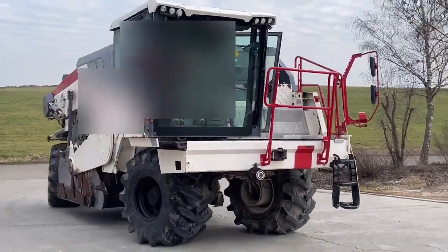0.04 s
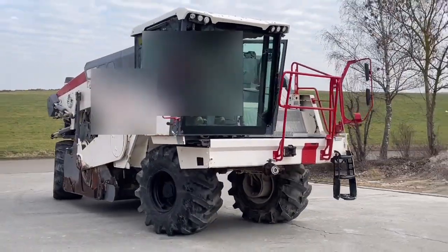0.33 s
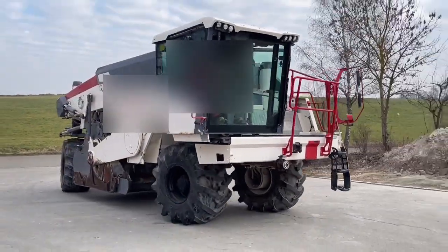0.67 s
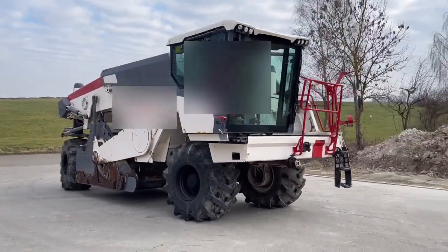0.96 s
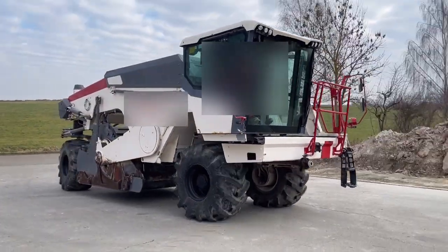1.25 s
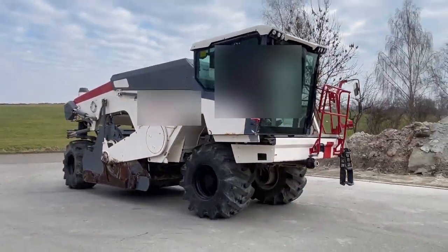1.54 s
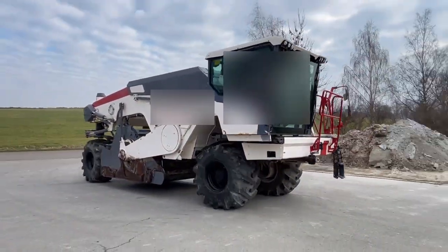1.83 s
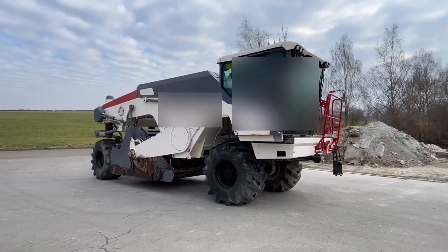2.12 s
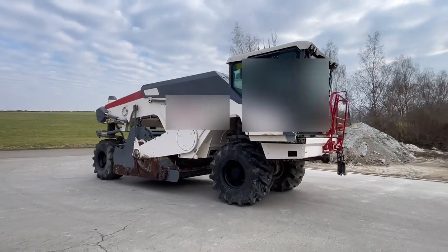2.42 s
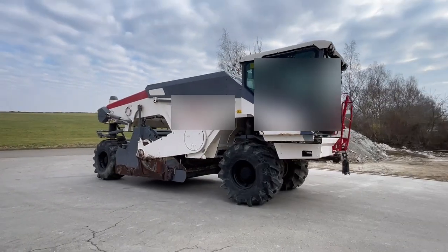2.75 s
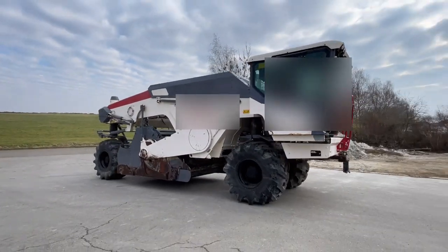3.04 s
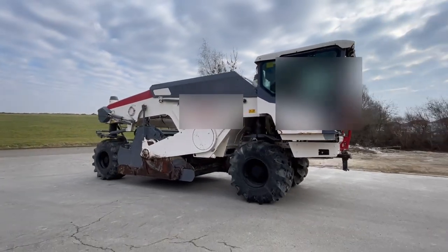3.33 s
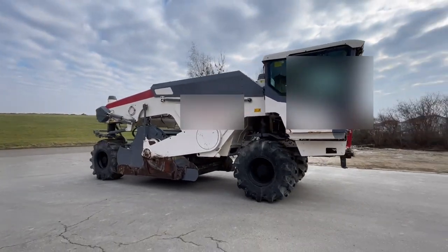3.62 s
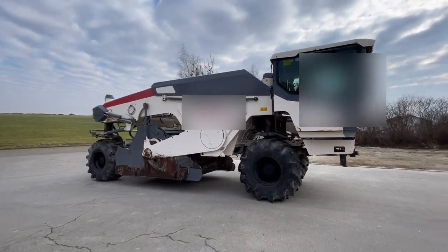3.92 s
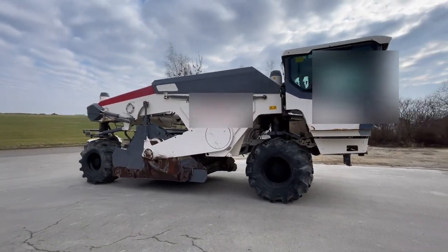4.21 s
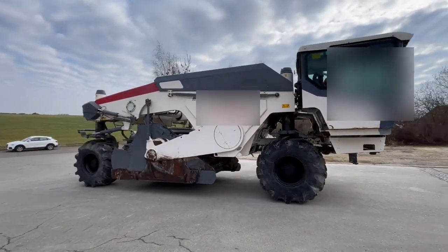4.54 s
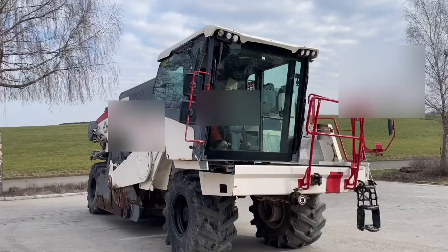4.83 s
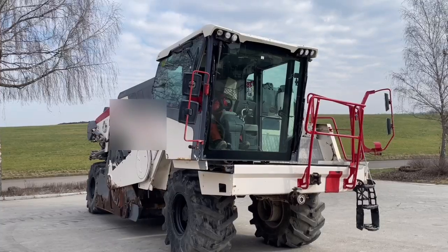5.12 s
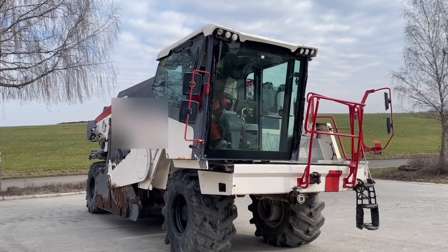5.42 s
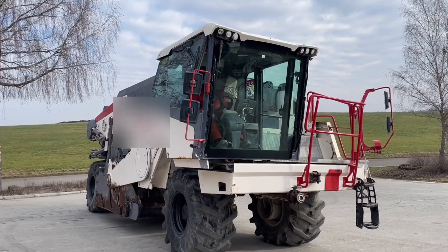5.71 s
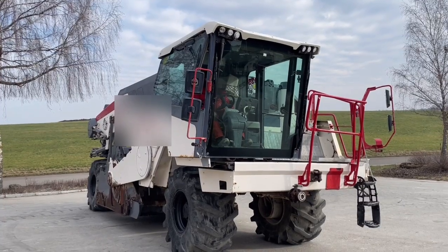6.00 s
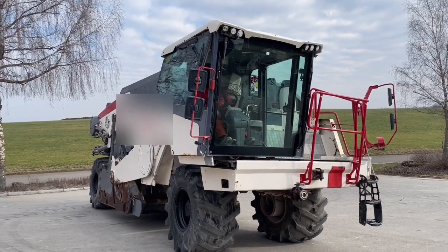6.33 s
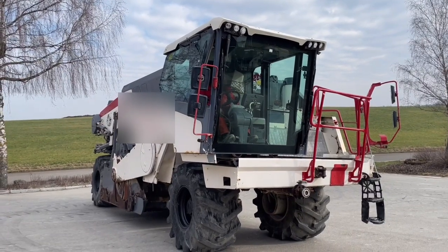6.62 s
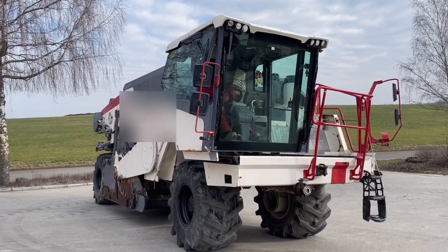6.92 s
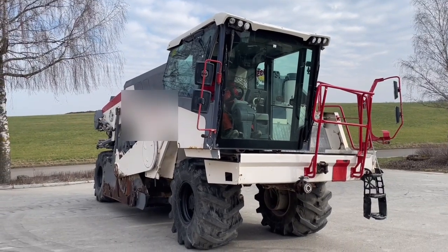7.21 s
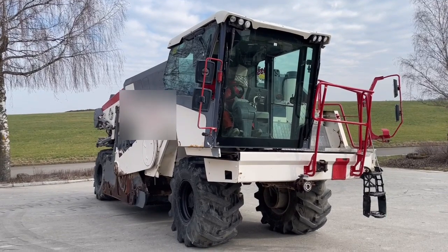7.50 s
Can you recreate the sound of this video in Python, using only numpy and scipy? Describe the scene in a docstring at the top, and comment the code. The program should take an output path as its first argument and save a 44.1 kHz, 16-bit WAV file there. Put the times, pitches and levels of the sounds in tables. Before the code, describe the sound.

From the start, a large diesel road machine runs at raised speed outdoors, heard close by while moving past it. The exhaust drones and throbs, the engine rattles and ticks, and a thin, high whistle of air sits on top. A hydraulic whine swells from about 1 to 3 seconds and again near 3.7 and 4.3, with short flares of higher gear whine. The clatter widens and the throb strengthens around 1.5 seconds; steel parts ring more from about 3.5. At 4.7 seconds everything fades quickly to a brief silence. By 5 seconds the engine is back, heard from the front at low idle: a deep, even drone with softer clatter, steady gear whine and quick, gentle chuffs of whistling air. One brief gritty scuff, like a shoe on paving, comes at about 5.2 seconds. The idle holds unchanged until the end, around 7.6 seconds.

```python
"""Six-cylinder diesel of a big road milling machine on a paved yard, heard while walking past its side.
At about 1600 rpm unequal cylinders make the exhaust throb, combustion and valve blows rattle the
block and ring the covers, a hydraulic pump and gears whine, and air whistles through a narrow opening.
After a short fade to silence it is heard from the front at low idle, about 1000 rpm, with a steady
gear whine, softly chuffing air and one brief scuff."""
import sys
import numpy as np
from scipy import signal
from scipy.fft import rfft, irfft, next_fast_len
from scipy.io import wavfile
from scipy.ndimage import uniform_filter1d, map_coordinates

SR = 44100
rng = np.random.default_rng(int(sys.argv[2]) if len(sys.argv) > 2 else 0)


def transcribe(u):
    """Save the signal u as a 16-bit wav file named by the first command-line argument.

    u: samples, shape (n,) or (channels, n), limited to [-1, 1]; the rate is SR.
    q: integer samples, one column per channel.
    """
    v = np.clip(np.atleast_2d(u).T, -1, 1)
    q = np.round(v * 32767).astype(np.int16)
    wavfile.write(sys.argv[1], SR, q)


N = 337806

# Raised engine speed, four-stroke cycles: time_s, cycle_hz
FAST_SPEED = [(0, 12.97), (0.3, 12.98), (0.7, 13.09), (1.05, 13.07), (1.5, 13.23), (2.0, 13.35),
              (2.5, 13.42), (3.0, 13.38), (3.5, 13.37), (4.0, 13.24), (4.7, 13.15)]
# Exhaust lines at raised speed: cycle_multiple, relative_db
DEEP_LINES = [(5, -33), (7, -34.5), (9, -24.5), (12, -30.5)]
THROB_LINES = [(9, -30), (10, -24), (11, -22.5), (12, -24.5), (13, -22.5), (14, -33)]
BUZZ_LINES = [(6, -27.5), (18, -32), (19, -32), (20, -27)]
# Exhaust lines at idle: cycle_multiple, level_db
IDLE_LINES = [(10, -35.5), (12, -21.5), (13, -37), (15, -30.5), (16, -33.5), (19, -42), (22, -40),
              (30, -39), (31, -41), (33, -40.5), (38, -47.5)]
# Exhaust parts along the walk: time_s, level_db
DEEP_LEVEL = [(0, -19.5), (.9, -21), (1.45, -35), (2.15, -31), (2.85, -25), (3.5, -29), (4.3, -36)]
THROB_LEVEL = [(.9, -34), (1.55, -22), (2.35, -21.5), (3.0, -24), (3.7, -26.5), (4.7, -27.5)]
OFFBEAT_LEVEL = [(2.5, -42), (3.1, -28), (4.7, -27.5)]
DRONE_LEVEL = [(0, -26.5), (1.65, -23), (2.15, -49), (3, -31), (4.7, -27.5)]
# Injector and valve ticks, ringing steel, pump and gear tones along the walk: time_s, level_db
TICK_LEVEL = [(0, -35.5), (1.25, -37.5), (1.5, -41), (3.4, -44.5), (3.65, -39), (4.7, -40.5)]
STEEL_LEVEL = [(2.5, -50), (3.5, -44.5), (3.9, -36.5), (4.7, -38)]
PUMP_WHINE_LEVEL = [(0, -21.5), (0.4, -30.5), (0.92, -33), (1.1, -21.5), (2.85, -23), (3.08, -32),
                    (3.38, -31), (3.72, -20), (3.94, -20.5), (4.1, -35), (4.3, -22.5), (4.7, -22.5)]
PUMP_HUM_LEVEL = [(0, -32), (0.6, -30), (1.35, -34.5), (1.8, -28.5), (1.95, -24.5), (2.85, -24.5),
                  (3.2, -28.5), (3.6, -36.5), (4.7, -34.5)]
GEAR_LEVEL = [(1.1, -51), (1.28, -42), (1.5, -49), (1.97, -33.5), (2.05, -49), (2.18, -38), (2.33, -38),
              (2.42, -54), (2.54, -39), (2.64, -50), (3.05, -46), (3.3, -35.5), (3.36, -46), (3.53, -38.5),
              (3.8, -53), (4.07, -41), (4.22, -54), (4.32, -39), (4.5, -51)]
# Resonances of covers and steel parts: centre_hz, half_width_hz, relative_db
FAST_COVER_MODES = [(788, 19, 4.5), (970, 47, 4), (1410, 9.4, -1.5), (1570, 100, -9.5), (2233, 190, -9.5),
                    (2783, 14, -9)]
IDLE_COVER_MODES = [(1530, 170, 3), (2360, 180, -2), (3600, 420, -7)]
STEEL_MODES = [(1620, 32, 2), (2776, 29, -7.5), (3320, 91, -11), (4060, 140, -11)]
# Pump and gear tones at idle: pitch_hz, level_db
IDLE_TONES = [(201.3, -37.5), (402.6, -40.5), (582.5, -40.5), (603, -48), (631.5, -38.5), (648, -40),
              (1163.6, -30), (1263.4, -41.5), (2529, -48.5)]
# Noise spectra: frequency_hz, relative_db
RUMBLE_SPECTRUM = [(16, -80), (30, -46), (55, -5), (134, -4.5), (259, -1.5), (328, -4.5), (377, -14),
                   (460, -15.5), (750, -85)]
FAST_BLOCK_SPECTRUM = [(250, -13.5), (380, -10.5), (570, -10), (700, -2), (980, -6.5), (1280, -14.5),
                       (1650, -14.5), (1950, -19), (2500, -25), (3300, -22.5), (5500, -28), (7300, -76)]
IDLE_BLOCK_SPECTRUM = [(16, -70), (28, -33), (50, -1.5), (85, -3.5), (125, 1), (185, -5), (295, -11),
                       (440, -14), (560, -14), (1020, -13), (1350, -23.5), (2000, -26), (2900, -30.5),
                       (5200, -43.5), (7000, -105)]
FAST_AIR_SPECTRUM = [(4000, 1.5), (5200, -14), (6900, 14), (8300, -7.5), (9400, 6), (12200, 4), (13000, -4),
                     (14000, -40)]
IDLE_AIR_SPECTRUM = [(4000, -12), (5200, 19.5), (6800, 16.5), (7500, 4.5), (8100, -13), (11600, 14.5),
                     (13000, -2.5), (14000, -20)]
# Stereo width of the noise: frequency_hz, side_minus_mid_db
NOISE_WIDTH = [(100, -18.5), (300, -13.5), (600, -11), (1300, -9.5), (3500, -5.5), (6000, -1.5), (9000, 9),
               (11500, -28)]
# Microphone balance: frequency_hz, left_minus_right_db
MIC_BALANCE = [(300, -1.97), (660, 1.3), (1200, 0.88), (2500, 0.61), (12000, -1.1)]


def exhaust(cycle, lines, scatter_turns, waver_db, blur_rad, rate_hz):
    """Unequal cylinders give lines at cycle multiples; low phase scatter bunches them into a chug."""
    return sum(tone(round(order) * cycle + scatter_turns * rng.random(), db, waver_db, blur_rad, rate_hz)
               for order, db in lines)


def fast_exhaust(cycle):
    """Deep note, drone and firing buzz over a rumble; one throb a cycle, later in the walk two."""
    deep_lag_cycles, throb_lag_cycles, offbeat_lag_cycles = 0.345, 0.675, 1.125
    deep = exhaust(cycle - deep_lag_cycles, DEEP_LINES, 0.072, waver_db=4.5, blur_rad=0.04, rate_hz=6)
    deep = amp(curve(DEEP_LEVEL)) * unit(deep)
    throb = 0
    for level, lag in ((THROB_LEVEL, throb_lag_cycles), (OFFBEAT_LEVEL, offbeat_lag_cycles)):
        chug = exhaust(cycle - lag, THROB_LINES, 0.06, waver_db=0.7, blur_rad=0.04, rate_hz=1.9)
        throb += amp(curve(level)) * unit(chug)
    drone = tone(15 * cycle, curve(DRONE_LEVEL), waver_db=1, blur_rad=0.05, rate_hz=1.7)
    buzz = exhaust(cycle, BUZZ_LINES, 0.63, waver_db=4.5, blur_rad=0.058, rate_hz=2)
    buzz = amp(walk_db(front_db=-24.5, side_db=-25.5, bay_db=2)) * unit(buzz)
    rumble_db = walk_db(-23, -24, 2.5) + 0.3 * np.cos(2 * np.pi * (cycle - throb_lag_cycles))
    blows = knocks(cycle, repeat=0.17, depth=0.4, decay=3.4, uneven_db=0.5)
    return deep + throb + drone + buzz + amp(rumble_db) * shaped(blows, RUMBLE_SPECTRUM)


def knocks(cycle, repeat, depth, decay, uneven_db, count=12, size=2048):
    """Combustion and valve blows, twelve a cycle; above the bass, part of the noise repeats each cycle."""
    lines = rfft(rng.standard_normal((2, size)))
    patterns = irfft(lines * (np.arange(lines.shape[1]) > 2 * count))
    repeating = np.array([np.interp(cycle % 1, np.arange(size) / size, p) for p in patterns])
    repeating *= np.sqrt(size * cycle[-1] / N)  # about the density of the free noise
    strength = amp(uneven_db * rng.standard_normal(count))[(cycle * count).astype(int) % count]
    blows = strength * np.exp(-decay * (cycle * count % 1))
    return (white() + repeat * repeating) * (1 + depth * unit(blows))


def fast_clatter(cycle):
    """Blows shake the block and ring covers and steel parts; injectors and valves tick."""
    def blows():
        return amp(0.36 * wobble(25.05)) * knocks(cycle, repeat=0.5, depth=0.21, decay=1.9, uneven_db=4.5)

    block = amp(walk_db(-22.5, -23, -0.45)) * shaped(flicker(blows(), depth_db=2), FAST_BLOCK_SPECTRUM)
    covers = amp(walk_db(-28, -29.5, 2)) * spread(blows(), ringing(FAST_COVER_MODES))
    tick_response = ringing([(3010, 470, 1), (3680, 200, -4.5), (4600, 250, -16)])
    ticks = amp(curve(TICK_LEVEL)) * spread(flicker(blows(), depth_db=2.7), tick_response)
    steel = amp(curve(STEEL_LEVEL)) * spread(blows(), ringing(STEEL_MODES))
    boom = amp(walk_db(-29.5, -41.5, 1)) * spread(blows(), ringing([(509, 38, 0)]))
    return block + covers + ticks + steel + boom


def idle_clatter(cycle):
    """Slower, more even blows on block and covers."""
    block = shaped(knocks(cycle, repeat=0.7, depth=0.11, decay=4.5, uneven_db=2.5), IDLE_BLOCK_SPECTRUM)
    cover_blows = knocks(cycle, repeat=0.24, depth=0.31, decay=1.7, uneven_db=5)
    return amp(-23.5) * block + amp(-42.5) * spread(cover_blows, ringing(IDLE_COVER_MODES))


def flicker(pair, depth_db):
    """Single pitches of the clatter flare and fade within hundredths of a second."""
    spectra = signal.stft(pair, nperseg=1024)[2]
    field = uniform_filter1d(rng.standard_normal(spectra.shape[1:]), size=3, axis=0)
    field = unit(uniform_filter1d(field, size=5, axis=1))
    return signal.istft(spectra * amp(depth_db * field), nperseg=1024)[1][:, :N]


def whine(turns, db, waver_db, blur_rad, rate_hz, side_db):
    """Machine tone whose reflections reach the two microphones differently."""
    side = tone(turns + rng.choice([-1, 1]) / 4, db + side_db, waver_db, blur_rad, rate_hz)
    return tone(turns, db, waver_db, blur_rad, rate_hz) + np.array([side, -side])


def fast_pump(cycle, order=48.45, beat_hz=6.2, beat_db=1.25):
    """Hydraulic pump: a throbbing whine, with its fundamental humming an octave below."""
    turns = order * cycle
    whine_db = curve(PUMP_WHINE_LEVEL) + beat_db * np.cos(2 * np.pi * beat_hz * time_s())
    octave = whine(turns, whine_db, waver_db=1.4, blur_rad=0.13, rate_hz=24, side_db=-16)
    hum = whine(turns / 2, curve(PUMP_HUM_LEVEL), waver_db=2.2, blur_rad=0.06, rate_hz=7.34, side_db=-21)
    return octave + hum


def fast_gears(cycle, order=140.1):
    """Gear whine locked to the engine, heard in short flares."""
    return whine(order * cycle, curve(GEAR_LEVEL), waver_db=3, blur_rad=0.4, rate_hz=45, side_db=6)


def idle_pump_and_gears(engine_s):
    """Steady tones that follow the engine."""
    return sum(whine(hz * engine_s, db, waver_db=1.56, blur_rad=0.11, rate_hz=18, side_db=-7.5)
               for hz, db in IDLE_TONES)


def whistle(centre_hz, half_width_hz, spacing_hz, bend_hz, squeak_db, wander_hz, flicker_db=9):
    """Air through a narrow opening: a hiss band and three unsteady squeaks that bend with pressure."""
    opening = ringing([(centre_hz, half_width_hz, 0)])
    sound = spread(white(), opening)
    for hz in (centre_hz - spacing_hz, centre_hz, centre_hz + spacing_hz):
        turns = np.cumsum(hz + bend_hz + wander_hz * wobble(20)) / SR
        flare = unit(amp(flicker_db * np.tanh(wobble(24))))
        blur_rad = np.array([wobble(40), wobble(40)])
        sound += amp(squeak_db) * opening(hz) * flare * np.sin(2 * np.pi * turns + blur_rad)
    return unit(sound)


def fast_air(cycle, rise_db_per_s=1.5):
    """Whistle, faint overtone and a hiss that grows as the side comes into view."""
    sing_db = walk_db(-31.5, -32.5, 2.5) + 1.3 * wobble(45)
    sing = whistle(6070, 235, spacing_hz=115, bend_hz=35 * wobble(8), squeak_db=0.5, wander_hz=25)
    overtone = spread(white(), ringing([(11900, 230, -2), (12800, 640, -6)]))
    hiss_db = -48 + rise_db_per_s * time_s() + chuff_db(cycle, once_db=0.5, twice_db=0.5, lag_turns=0.29)
    hiss = shaped(white(), FAST_AIR_SPECTRUM)
    return amp(sing_db) * sing + amp(walk_db(-53.5, -62.5, 3.5)) * overtone + amp(hiss_db) * hiss


def idle_air(cycle, sag_hz_per_s=35):
    """Whistle and hiss chuff at nine strokes a second; the pitch slowly sags."""
    bend_hz = 22 * np.cos(stroke_rad(cycle, lag_turns=0.61)) - sag_hz_per_s * (time_s() - 5)
    sing_db = -39.5 + chuff_db(cycle, once_db=1, twice_db=2, lag_turns=0.25)
    sing = whistle(5820, 175, spacing_hz=140, bend_hz=bend_hz, squeak_db=1, wander_hz=18)
    hiss_db = -48 + chuff_db(cycle, once_db=2.5, twice_db=1, lag_turns=0.4)
    return amp(sing_db) * sing + amp(hiss_db) * shaped(white(), IDLE_AIR_SPECTRUM)


def chuff_db(cycle, once_db, twice_db, lag_turns):
    """Level swing over each air stroke."""
    angle_rad = stroke_rad(cycle, lag_turns)
    return once_db * np.cos(angle_rad) + twice_db * np.cos(2 * angle_rad)


def stroke_rad(cycle, lag_turns, order=1.09):
    """Angle of an air stroke geared a little faster than the engine cycle."""
    return 2 * np.pi * (order * cycle - lag_turns)


def scuff(start_s=5.169, rise_s=0.0023, t60_s=0.28, db=-36):
    """Short gritty scuff, like a shoe on paving."""
    age_s = np.maximum(time_s() - start_s, 0)
    grit = shaped(white(), [(600, -30), (1800, 3), (3500, 8), (7500, -16), (12500, -1), (14000, -12)])
    return amp(db - 60 * age_s / t60_s) * (1 - np.exp(-age_s / rise_s)) * grit


def walk_db(front_db, side_db, bay_db, corner_s=2.02, ease_s=0.36, bay_s=1.53, bay_half_s=0.76):
    """Level before and after the front corner, plus a swell abreast of the engine bay."""
    round_corner = (1 + np.tanh((time_s() - corner_s) / ease_s)) / 2
    abreast = np.exp(-((time_s() - bay_s) / bay_half_s) ** 2)
    return front_db + (side_db - front_db) * round_corner + bay_db * abreast


def widened(pair):
    """Treble comes from one place in front, from the machine's whole length along the side."""
    mid, side = (pair[0] + pair[1]) / 2, (pair[0] - pair[1]) / 2
    treble = filtered(side, lambda hz: along([(700, 0.85), (2000, 1)], hz))
    side = side + treble * (amp(walk_db(-10, 3.5, 10)) - 1)
    return np.array([mid + side, mid - side])


def tone(turns, db, waver_db, blur_rad, rate_hz):
    """Sine that wavers in level and phase."""
    peak = np.sqrt(2) * amp(db + waver_db * wobble(rate_hz))
    return peak * np.sin(2 * np.pi * turns + blur_rad * wobble(rate_hz))


def ringing(modes):
    """Response of resonances: centre_hz, half_width_hz, relative_db."""
    return lambda hz: np.sqrt(sum((amp(db) / (1 + ((hz - centre_hz) / half_width_hz) ** 2)) ** 2
                                  for centre_hz, half_width_hz, db in modes))


def spread(pair, response):
    """Two noises filtered as mid and side; mid rms 1."""
    mid, side = filtered(pair, lambda hz: response(hz) * amp([0 * hz, along(NOISE_WIDTH, hz)]))
    return np.array([mid + side, mid - side]) / np.std(mid)


def shaped(pair, spectrum):
    """Stereo noise with a spectrum: frequency_hz, relative_db."""
    return spread(pair, lambda hz: amp(along(spectrum, hz)))


def filtered(x, response):
    """Apply a frequency response."""
    size = next_fast_len(N + SR // 10, True)
    return irfft(rfft(x, size) * response(np.fft.rfftfreq(size, 1 / SR)), size)[..., :N]


def wobble(rate_hz):
    """Smooth random curve."""
    knots = rng.standard_normal(1024)
    coarse_s = time_s()[::64]
    return np.interp(time_s(), coarse_s, map_coordinates(knots, [coarse_s * rate_hz], mode="wrap"))


def along(points, hz):
    """Interpolate over log frequency."""
    points_hz, values = np.transpose(points)
    return np.interp(np.log(hz + 1), np.log(points_hz + 1), values)


def curve(points):
    """Interpolate over time."""
    return np.interp(time_s(), *np.transpose(points))


def white():
    return rng.standard_normal((2, N))


def time_s():
    return np.arange(N) / SR


def amp(db):
    return 10 ** (np.asarray(db) / 20)


def unit(x):
    """Scale to rms 1."""
    return x / np.sqrt(np.mean(x ** 2) + 1e-20)


def raised_speed():
    """About 1600 rpm; tones swell and fade as the listener walks through their beams."""
    cycle = np.cumsum(curve(FAST_SPEED)) / SR
    return fast_clatter(cycle) + fast_pump(cycle) + fast_gears(cycle) + fast_air(cycle) + fast_exhaust(cycle)


def low_idle(cycle_hz=8.31):
    """About 1000 rpm; deep, even exhaust drone under the gear whine."""
    engine_s = time_s() + 0.00022 * wobble(1.5)  # the governor hunts slightly
    cycle = cycle_hz * (engine_s + 1)
    drone = exhaust(cycle, IDLE_LINES, scatter_turns=0.78, waver_db=0.5, blur_rad=0.53, rate_hz=5)
    return drone + idle_clatter(cycle) + idle_pump_and_gears(engine_s) + idle_air(cycle)


def scene():
    """Raised speed fades out; after a brief silence the idle fades in."""
    fade_out = np.interp(time_s(), [4.71, 4.79, 4.812], [1, 0.45, 0])
    fade_in = np.interp(time_s(), [4.89, 4.93, 5.04], [0, 0.1, 1])
    return fade_out * widened(raised_speed()) + fade_in * low_idle() + scuff()


def record(dry):
    """Two band-limited microphones of slightly unequal colour; the nearer left one hears earlier."""
    lead_s, lead_limit_hz, top_hz = 0.00009, 900, 13850
    balance = lambda hz: amp(np.outer([0.5, -0.5], along(MIC_BALANCE, hz)))
    lead = lambda hz: np.exp(2j * np.pi * np.outer([0.5, -0.5], np.minimum(hz, lead_limit_hz)) * lead_s)
    return filtered(dry, lambda hz: balance(hz) * lead(hz) * (hz < top_hz))


dry = scene()
out = record(dry)
transcribe(out)
```